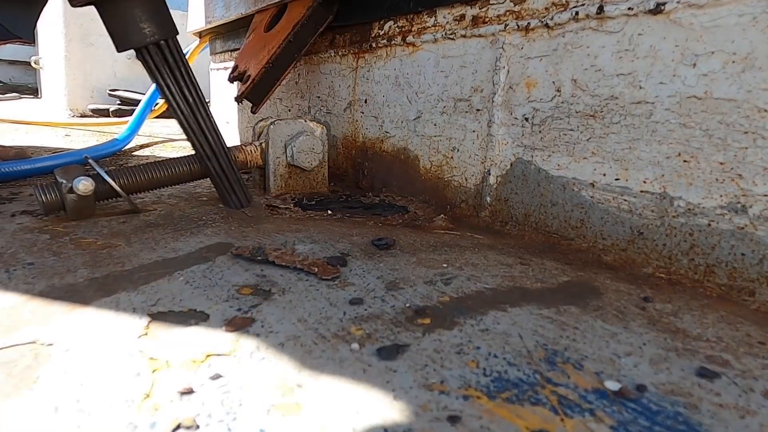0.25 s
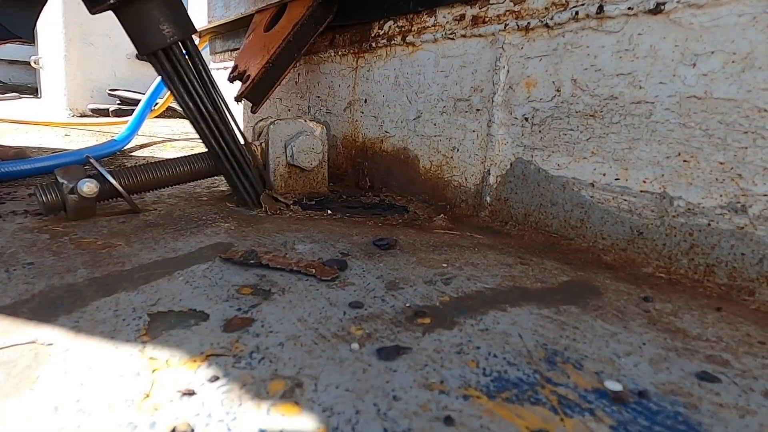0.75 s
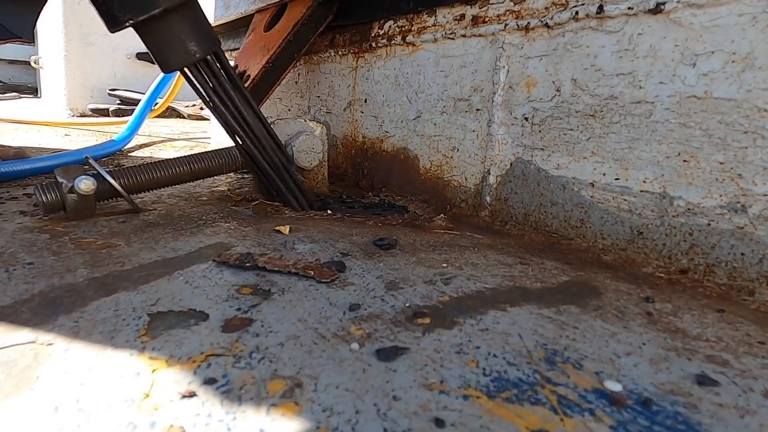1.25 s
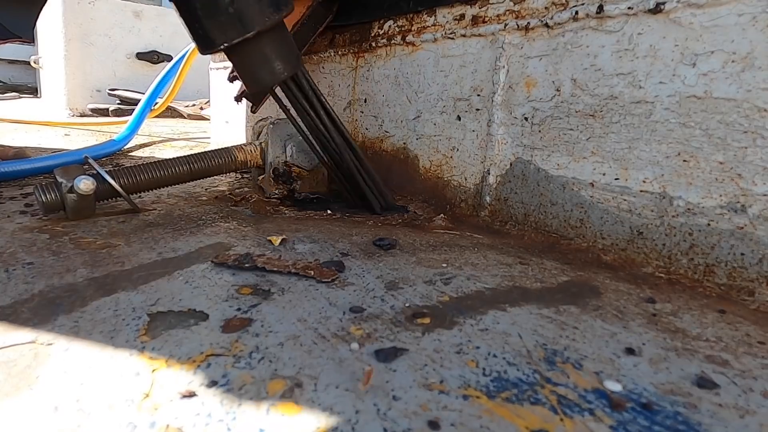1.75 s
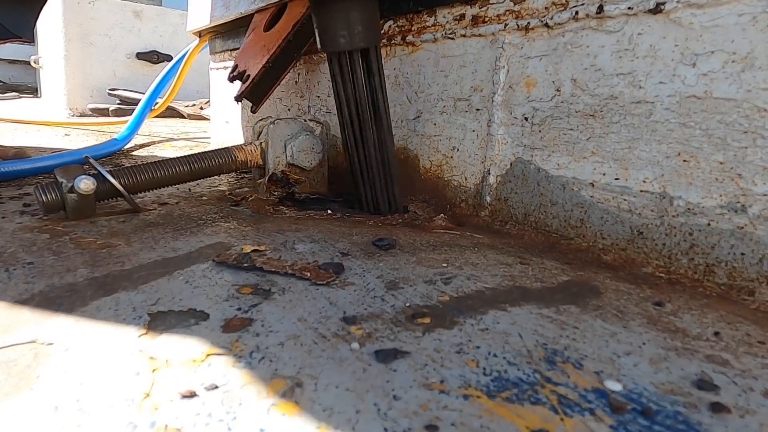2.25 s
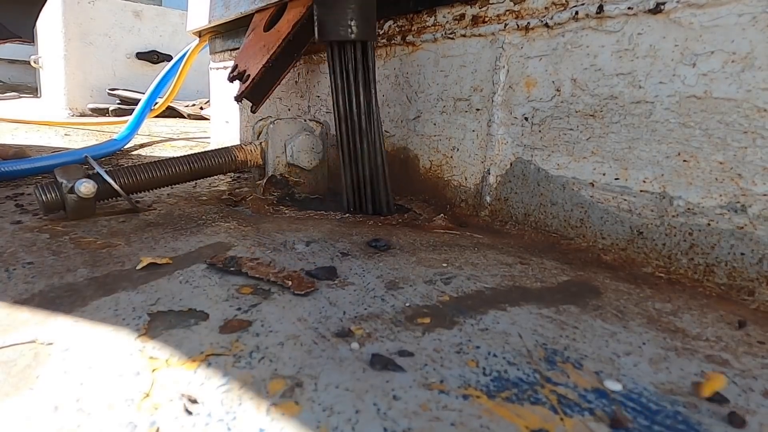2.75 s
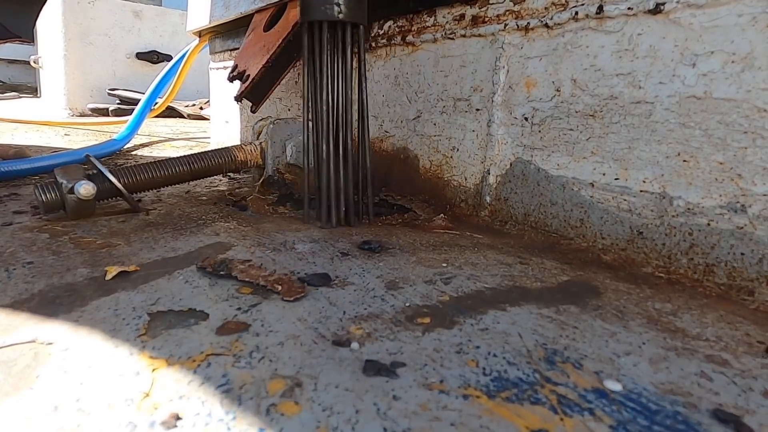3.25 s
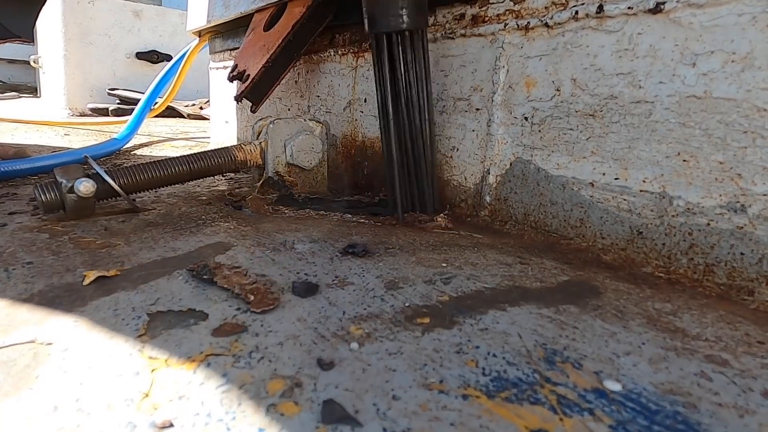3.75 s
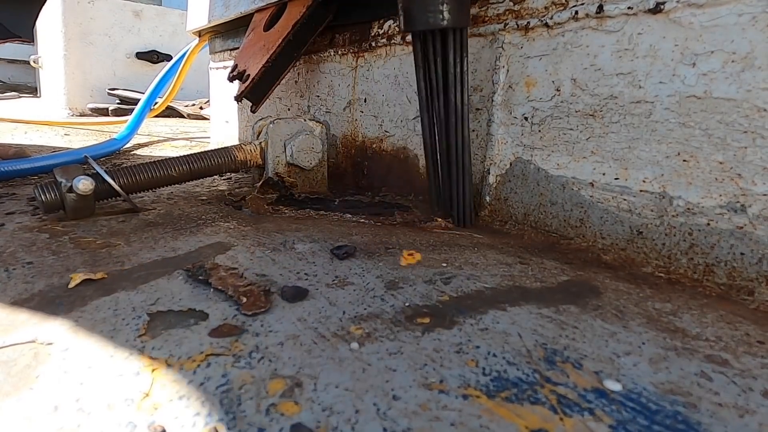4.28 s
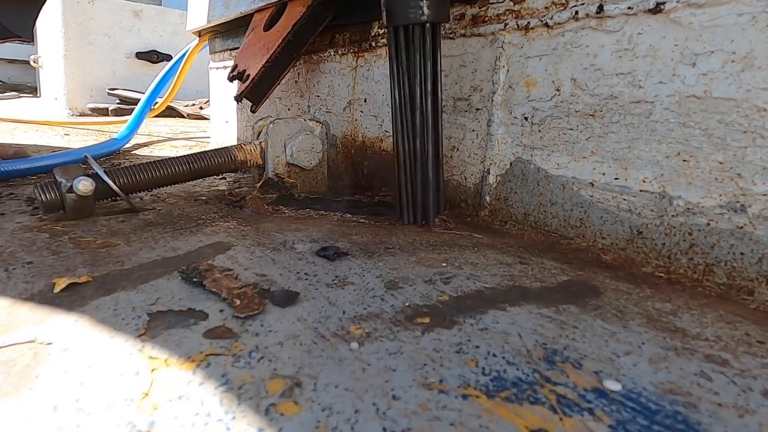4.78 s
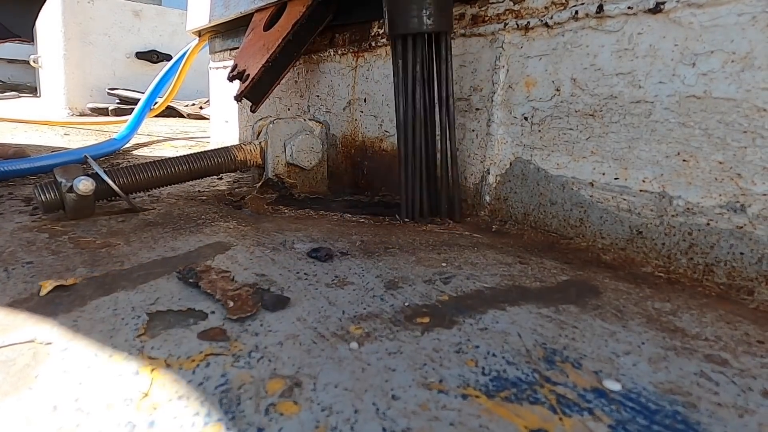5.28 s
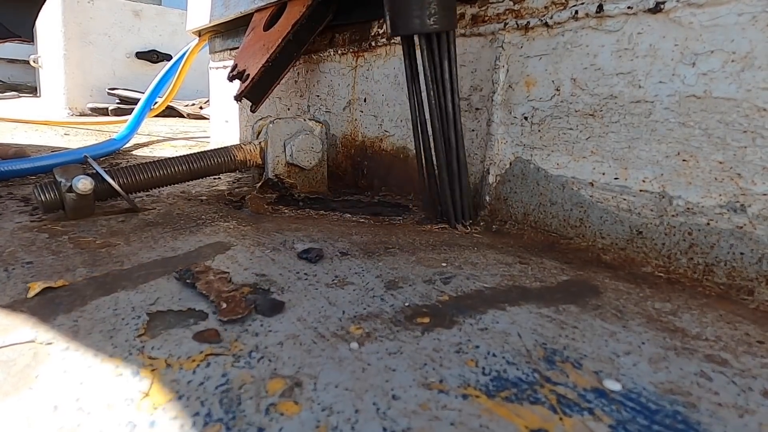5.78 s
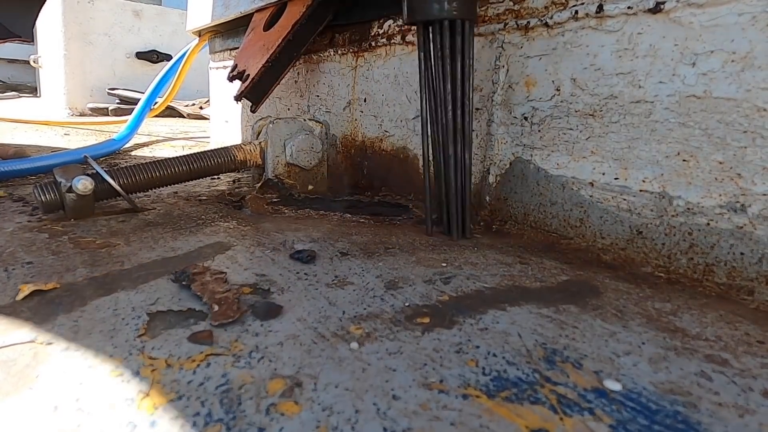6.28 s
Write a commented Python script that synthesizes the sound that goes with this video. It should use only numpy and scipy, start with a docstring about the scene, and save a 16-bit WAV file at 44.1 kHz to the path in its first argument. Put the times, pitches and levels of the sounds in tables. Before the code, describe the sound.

Very close to the microphone, an air-driven needle gun hammers a steel deck without pause, about 36 blows a second. Dull, short plate knocks carry a bright clatter of loose needles, with compressed-air hiss and low buffeting rumble. It starts denser beside a bolt, then moves onto open plate, looser and more uneven, with brief harsher bites. Dry, almost mono, with faint high fizz on the right.

```python
"""Needle gun on a steel deck

A pneumatic needle gun chips rust close by, striking about 36 times a second.
Each stroke sends a bending wave through the plate; loose needles then clatter down and rebound.
Exhaust air hisses, with a high fizz on the right only, and buffets the microphone with a low rumble.
A limiter turns the sound down briefly around each loud peak."""
import sys
import numpy as np
from scipy import signal
from scipy.fft import rfft, irfft
from scipy.io import wavfile
from scipy.ndimage import uniform_filter1d, minimum_filter1d

SR = 44100
rng = np.random.default_rng(int(sys.argv[2]) if len(sys.argv) > 2 else 0)


def transcribe(u):
    """Save the signal u as a 16-bit wav file named by the first command-line argument.

    u: samples, shape (n,) or (channels, n), limited to [-1, 1]; the rate is SR.
    q: integer samples, one column per channel.
    """
    v = np.clip(np.atleast_2d(u).T, -1, 1)
    q = np.round(v * 32767).astype(np.int16)
    wavfile.write(sys.argv[1], SR, q)


N = 287752
T = np.arange(N) / SR  # time of every sample, in seconds
MS = SR / 1000  # samples in a millisecond

# Piston speed, which wanders with the pressure of the hand: t/s, strokes per second
PISTON_SPEED = [(0.0, 35.25), (0.93, 36.54), (1.44, 35.53), (1.76, 36.77), (2.09, 35.08), (2.79, 37.36),
                (3.04, 36.42), (3.2, 38.97), (3.5, 35.95), (3.93, 37.36), (4.58, 36.91), (4.68, 38.47),
                (4.86, 35.85), (5.28, 38.15), (5.41, 35.88), (5.67, 38.48), (5.77, 36.9), (6.52, 38.67)]
# Handling: t/s, place (0 beside the bolt, 1 open plate), blow level/dB, scatter of the needles/ms
HANDLING_CURVE = [(0, 0.056, -2, 3.55), (1.15, 0, -0.5, 3.43), (1.6, 0.25, -3, 2.3),
                  (2.15, 0.56, -0.5, 1.71), (2.5, 0.86, -6.5, 3.2), (3.3, 0.91, -6, 4.3), (4.2, 1, -2, 2.6),
                  (4.7, 1, -2.5, 4.1), (5.5, 0.91, -2, 2.78), (6.52, 0.95, -5.5, 3.4)]
# Spectrum of one blow's bending wave: f/Hz, level/dB
BLOW_SPECTRUM = [(50, -17), (110, -25), (170, -2.5), (250, 0), (340, -1), (440, 3), (560, -10), (680, -11),
                 (850, -7.5), (1050, -22), (1350, -13), (1750, -28), (2150, -27), (2800, -39), (4500, -35),
                 (8000, -120)]
# Plate modes (the tones the steel rings at) beside the bolt: f/Hz, level/dB, time to fall 60 dB/s
BOLT_PLATE_MODES = [(231.8, 10, 0.036), (455, 7, 0.013), (540, 3, 0.033), (843, -7, 0.056),
                    (1090, -4, 0.026), (1293, -6.5, 0.042), (1414, -9, 0.044), (2115, 3, 0.011)]
# Modes of the open plate: f/Hz, level/dB, time to fall 60 dB/s
OPEN_PLATE_MODES = [(165, -15, 0.076), (417, -2, 0.044), (806, -5, 0.038), (928, -5, 0.033),
                    (1223.6, -6, 0.05), (1520, -16, 0.071), (2020, -6, 0.014)]
# Needle clatter between bites, strong at first on the open plate and weaker later:
# t/s, relative level/dB, relative weight of the lower ring/dB
CLATTER_CURVE = [(0, -30, -1), (1.35, -29, 2), (1.6, -27, 2), (2.2, -27.5, -2.5), (2.5, -28.5, -1.5),
                 (3.2, -26, 1.5), (3.7, -32.5, -0.5), (4.25, -31.5, -11.5), (4.9, -30, -3), (5.8, -34, -13),
                 (6.52, -32.5, -15)]
# Bites, when the needles bite into the scale and ring out:
# start t/s, length/s, level change/dB, extra weight of the lower ring/dB
NEEDLE_BITES = [(0.0, 0.2, 3, 4.5), (0.857, 0.18, 3.5, -2.5), (2.357, 0.14, 4.5, 0), (2.584, 0.096, 1.5, 8),
                (2.76, 0.12, 2.5, 0), (3.28, 0.14, -2, 9), (3.862, 0.19, 2.5, 11.5),
                (4.502, 0.14, 4.5, 10.5), (4.706, 0.16, 2, 4), (5.227, 0.13, 8, 9.5),
                (5.586, 0.14, 6.5, 12), (5.903, 0.059, 5.5, 5), (6.22, 0.38, 4, 11)]
# Spectrum of a needle's crack: f/Hz, level/dB per Hz
CRACK_SPECTRUM = [(100, -27), (800, -2.5), (1700, 1), (2400, -6), (3300, 3), (4200, -0.5), (4900, -2.5),
                  (5500, -6), (6500, -16), (8200, -29), (11000, -35), (16000, -42)]
# Modes of the needle bundle pressed aslant by the bolt: f/Hz, level/dB, time to fall 60 dB/s
PRESSED_NEEDLE_MODES = [(2155, 0, 0.04), (2564, -0.5, 0.034), (2830, 7, 0.02), (3058, 14.5, 0.016),
                        (3370, 1.5, 0.028), (4004, -7.5, 0.13), (4600, -8.5, 0.037), (4810, -4.5, 0.07),
                        (5180, -6.5, 0.038)]
# Modes of the needle bundle free on the plate: f/Hz, level/dB, time to fall 60 dB/s
FREE_NEEDLE_MODES = [(2179, 1.5, 0.036), (2563, 0, 0.029), (2707, 0.5, 0.021), (2970, -4, 0.028),
                     (3245, 0.5, 0.062), (3530, 7, 0.018), (3796, -3.5, 0.021), (3900, -1.5, 0.026),
                     (4260, -5, 0.042), (4523, -9, 0.079), (4860, -10, 0.05)]
# Exhaust jet: t/s, relative level/dB
JET_CURVE = [(0, -42.5), (1, -43), (2, -45), (2.6, -48), (3.6, -47), (5, -44.5), (5.6, -45.5),
             (6.52, -46.5)]
# Spectrum of the exhaust hiss: f/Hz, level/dB per Hz
HISS_SPECTRUM = [(300, -35), (2000, -52), (4500, 37), (6500, 30.5), (8200, 5.5), (10500, 16), (13000, -21),
                 (16000, -83)]
# Spectrum of the high fizz on the right: f/Hz, level/dB per Hz
FIZZ_SPECTRUM = [(10500, -50), (11200, -14), (11900, 0), (12700, -.5), (13500, -3), (16000, -5)]
# Thin whistles, the first in the hiss, the second in the fizz: f/Hz, width/Hz, level above the noise/dB
EXHAUST_WHISTLES = [(9500, 170, 3), (13000, 150, 7)]
# Exhaust air on the microphone, weakest while the gun leans far over: t/s, relative level/dB
WIND_CURVE = [(0, -19), (0.9, -16.5), (2.0, -22), (2.7, -19.5), (4.7, -17.5), (6.52, -18)]
# Spectrum of the draught's rumble: f/Hz, level/dB per Hz
RUMBLE_SPECTRUM = [(10, -15), (25, -22), (50, -0.5), (85, 1), (130, -4.5), (210, -9), (300, -11),
                   (450, -10.5), (620, -15.5), (1200, -24), (2500, -25.5), (8000, -51)]
# Hum of the draught, first beside the bolt, then over the open plate: f/Hz, width/Hz, level/dB
DRAUGHT_HUMS = [(235, 70, 7), (162, 40, 10)]


def amp(db):
    """Turns decibels into a plain multiplier."""
    return 10 ** (np.asarray(db) / 20)


def unit(x):
    """Scales to an rms (average strength) of 1."""
    return x / np.sqrt(np.mean(x ** 2) + 1e-20)


def follow(rows, t):
    """Reads every column of a curve at times t."""
    seconds, *columns = np.transpose(rows)
    return [np.interp(t, seconds, column) for column in columns]


def gains(points, hz):
    """Reads a spectrum on a log-frequency axis, as multipliers."""
    f, db = np.transpose(points)
    return amp(np.interp(np.log(hz + 1), np.log(f + 1), db))


def noise(points, size=N, peaks=()):
    """Random noise shaped to a spectrum, with optional narrow peaks."""
    hz = np.fft.rfftfreq(size, 1 / SR)
    peak_db = sum(db / (1 + (2 * (hz - f) / width) ** 2) for f, width, db in peaks)
    shape = gains(points, hz) * amp(peak_db)
    return unit(irfft(rfft(rng.standard_normal(size)) * shape, size))


def clicks(times, sizes):
    """A train of single-sample impulses."""
    at = np.round(np.ravel(times) * SR).astype(int)
    return np.bincount(np.maximum(at, 0), np.ravel(sizes), N)[:N]


def convolve(x, response):
    """Starts a copy of the response at every impulse."""
    return signal.oaconvolve(x, response)[:N]


def butter(x, order, hz, kind, run=signal.sosfilt):
    """Keeps one part of the frequency range."""
    return run(signal.butter(order, hz, kind, fs=SR, output="sos"), x)


def ring(modes, weights, detune=0):
    """Dying sines of a struck piece of steel, with a soft start."""
    hz, db, t60 = np.transpose(modes)[:, :, None]
    t = T[:SR // 8]
    fade = np.exp(-np.log(1000) * t / t60) * np.tanh(t * hz) ** 2
    sines = np.sin(2 * np.pi * hz * (1 + detune) * t)
    return weights @ (amp(db) * fade * sines)


def stroke_times(first_turn=0.064, steady_ms=0.15, stumble_ms=0.45):
    """The piston strikes once a turn, steady beside the bolt and stumbling a little on the open plate."""
    turns = np.cumsum(follow(PISTON_SPEED, T)[0]) / SR - first_turn
    due = T[1:][np.diff(np.floor(turns)) > 0]
    place = follow(HANDLING_CURVE, due)[0]
    scatter_ms = np.interp(place, [0, 1], [steady_ms, stumble_ms])
    return due + scatter_ms * rng.standard_normal(len(due)) / 1000


def bending_wave(dispersion=0.882):
    """High bending waves outrun low ones, so a blow arrives as a falling chirp."""
    hz = np.fft.rfftfreq(SR // 10, 1 / SR)
    delays = np.exp(-1j * dispersion * np.sqrt(hz))  # the lower the tone, the later it comes
    chirp = irfft(gains(BLOW_SPECTRUM, hz) * 1j * delays)[:SR // 20]
    chirp *= np.tanh(np.arange(len(chirp)) / MS) ** 2  # soft start
    return chirp / chirp.max()


def plate(strokes, blow_db=2.5, modes_db=-10, uneven_db=1.5, bolt_lag_ms=3.075, open_lag_ms=3.143):
    """Each blow sends a bending wave through the plate, which rings on in its modes."""
    place, force_db, _ = follow(HANDLING_CURVE, strokes)
    force = amp(force_db + uneven_db * rng.standard_normal(len(strokes)))
    wave = amp(blow_db) * convolve(clicks(strokes, force), bending_wave())
    bolt = BOLT_PLATE_MODES, 1 - place, bolt_lag_ms
    open_plate = OPEN_PLATE_MODES, place, open_lag_ms
    for modes, share, lag_ms in (bolt, open_plate):
        blows = clicks(strokes + lag_ms / 1000, force * share * amp(modes_db))
        wave += convolve(blows, ring(modes, np.ones(len(modes))))
    return wave


def needles(strokes, level_db=4, lower_db=-2.5, split_hz=2900, free_at=0.81, count=19):
    """The whole bundle clatters, ringing more freely once it leaves the bolt."""
    free = np.clip(follow(HANDLING_CURVE, T)[0] / free_at, 0, 1)
    bundle = [needle_hits(strokes) for _ in range(count)]
    clatter = np.zeros(N)
    for hits in bundle:
        clatter += convolve(hits * np.sqrt(1 - free), needle_ring(PRESSED_NEEDLE_MODES))
        clatter += convolve(hits * np.sqrt(free), needle_ring(FREE_NEEDLE_MODES))
    clatter_db, weight_db = biting()
    clatter = ring_out(clatter, clatter_db)
    # the piston shares a steady energy among the needles
    clatter /= np.sqrt(uniform_filter1d(clatter ** 2, SR // 9) + 1e-9)
    upper = butter(clatter, 4, split_hz, "high", signal.sosfiltfilt)
    lower = amp(weight_db + lower_db) * (clatter - upper)
    # level and lower ring follow the bites
    bright = amp(clatter_db + level_db) * (upper + lower) / upper.std()
    return bright + knock(sum(bundle))


def needle_hits(strokes, flight_ms=3.8, rebound_ms=16, rebound_db=-9, hit_spread_db=3, contact_db=3):
    """One needle lands after each blow and rebounds; its contact comes and goes over several strokes."""
    scatter_ms = follow(HANDLING_CURVE, strokes)[2]
    first, second, contact = rng.standard_normal((3, len(strokes)))
    grip = amp(contact_db * unit(uniform_filter1d(contact, size=5)))
    late_ms = flight_ms + scatter_ms * rng.exponential(1, len(strokes))
    land = strokes + late_ms / 1000
    again = land + rebound_ms * rng.uniform(0.2, 1.3, len(strokes)) / 1000
    landings = clicks(land, grip * amp(hit_spread_db * first))
    rebounds = clicks(again, grip * amp(hit_spread_db * second + rebound_db))
    return landings + rebounds


def needle_ring(modes, ring_db=4, detune=0.006):
    """One needle's hit is a short crack plus its own mix of the bundle's modes."""
    t_ms = np.arange(SR // 8) / MS
    envelope = np.tanh(t_ms / 0.2) ** 2 * np.exp(-t_ms / 2.6)
    crack = noise(CRACK_SPECTRUM, len(t_ms)) * envelope
    weights, mistuning = rng.standard_normal((2, len(modes)))
    tones = ring(modes, weights, detune * mistuning[:, None])
    return unit(crack) + amp(ring_db) * unit(tones)


def biting(edge_s=0.063):
    """Each bite sets in, holds and dies away; gives clatter level and lower-ring weight in dB."""
    level_db, weight_db = follow(CLATTER_CURVE, T)
    for start, length, rise_db, extra_db in NEEDLE_BITES:
        inside_s = np.minimum(T - start, start + length - T)
        grip = np.clip(0.5 + inside_s / edge_s, 0, 1)
        level_db = level_db + rise_db * grip
        weight_db = weight_db + extra_db * grip
    return level_db, weight_db


def ring_out(clatter, level_db, low_hz=3200, high_hz=3900, from_db=-30, gain_per_db=0.5):
    """The harder the needles bite, the more the bundle's main modes stand out."""
    main = butter(clatter, 2, [low_hz, high_hz], "band", signal.sosfiltfilt)
    boost = amp(gain_per_db * np.maximum(level_db - from_db, 0))
    return clatter + (boost - 1) * main


def knock(hits, level_db=-29, lowest_hz=750):
    """The light needle tips stir the higher modes of the plate too."""
    place = follow(HANDLING_CURVE, T)[0]
    rung = np.zeros(N)
    for modes, share in (BOLT_PLATE_MODES, 1 - place), (OPEN_PLATE_MODES, place):
        rung += convolve(hits * np.sqrt(share), ring(modes, np.ones(len(modes))))
    return amp(level_db) * unit(butter(rung, 3, lowest_hz, "high"))


def exhaust(strokes, hiss_db=6, fizz_db=9, leak=0.32, vent_lag_ms=2, return_lag_ms=13,
            return_size=0.36, puff_ms=6):
    """Air vents on the forward stroke and again on the return, over a steady leak."""
    each = np.ones(len(strokes))
    forward = clicks(strokes + vent_lag_ms / 1000, each)
    backward = clicks(strokes + return_lag_ms / 1000, return_size * each)
    puff = np.exp(-np.arange(SR // 20) / MS / puff_ms)
    flow = unit(leak + convolve(forward + backward, puff))
    hiss = amp(hiss_db) * noise(HISS_SPECTRUM, peaks=EXHAUST_WHISTLES[:1])
    fizz = amp(fizz_db) * noise(FIZZ_SPECTRUM, peaks=EXHAUST_WHISTLES[1:])
    left_right = np.array([hiss, hiss + fizz])
    return amp(follow(JET_CURVE, T)[0]) * flow * left_right


def draught(level_db=1.5):
    """Spent air buffets the microphone as a rumble, with a hum that sinks over the open plate."""
    place = follow(HANDLING_CURVE, T)[0]
    by_bolt = np.sqrt(1 - place) * noise(RUMBLE_SPECTRUM, peaks=DRAUGHT_HUMS[:1])
    in_open = np.sqrt(place) * noise(RUMBLE_SPECTRUM, peaks=DRAUGHT_HUMS[1:])
    rumble = by_bolt + in_open
    # a constant supply evens out the gusts
    gusts = np.sqrt(uniform_filter1d(rumble ** 2, SR // 12) + 1e-9)
    return amp(follow(WIND_CURVE, T)[0] + swell() + level_db) * rumble / gusts


def swell(depth_db=0.8, step_s=0.177):
    """Slow random rise and fall of the air flow, in dB."""
    steps = rng.standard_normal(256)
    return depth_db * np.interp(T / step_s, np.arange(len(steps)), steps)


def scene():
    """Steel, draught and hiss are in the middle; only the fizz sits on the right."""
    strokes = stroke_times()
    return plate(strokes) + needles(strokes) + draught() + exhaust(strokes)


def record(dry, ceiling_db=-4, strength=0.85, hold_ms=9.15, release_ms=2, edge_hz=15720):
    """A look-ahead limiter catches loud peaks, holds briefly and lets go; then the top treble is cut."""
    over_db = np.maximum(20 * np.log10(abs(dry).max(0) + 1e-6) - ceiling_db, 0)
    ahead, hold = SR // 500, int(hold_ms * MS)  # both in samples
    # the two minus signs turn the sliding minimum into a sliding maximum
    held = -minimum_filter1d(-over_db, hold + ahead, origin=(hold - ahead) // 2)
    r = np.exp(-1 / (release_ms * MS))
    released = signal.lfilter([1 - r], [1, -r], held)
    duck_db = uniform_filter1d(np.maximum(held, released), ahead)
    limited = dry * amp(-strength * duck_db)
    low_pass = signal.firwin(801, edge_hz, window=("kaiser", 9), fs=SR)
    return signal.oaconvolve(limited, low_pass[None], "same")


dry = scene()
out = record(dry)
transcribe(out)
```